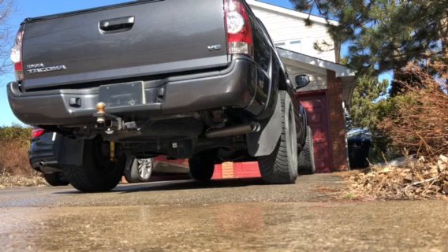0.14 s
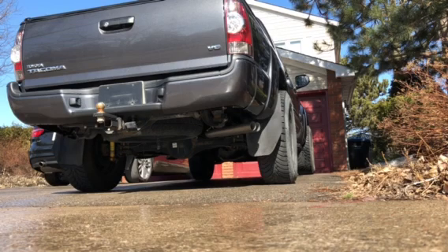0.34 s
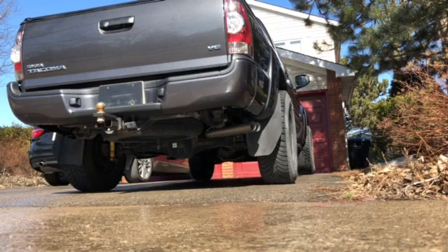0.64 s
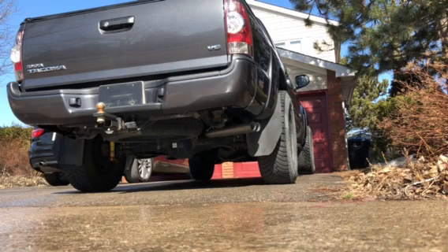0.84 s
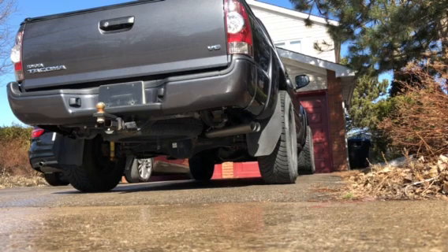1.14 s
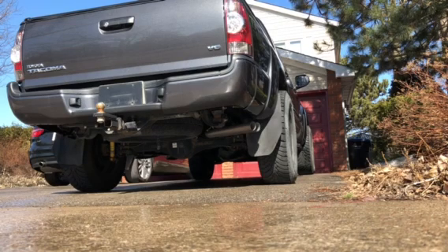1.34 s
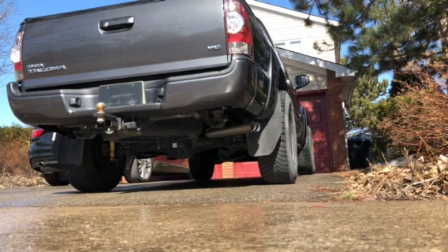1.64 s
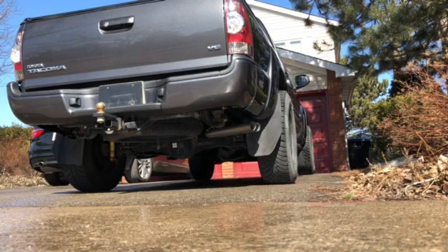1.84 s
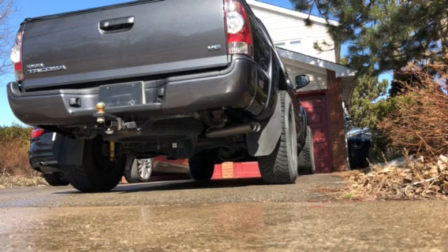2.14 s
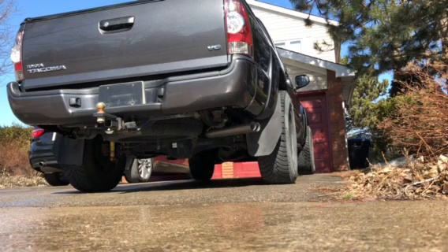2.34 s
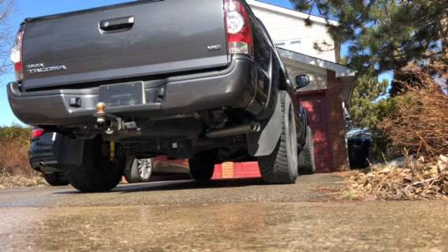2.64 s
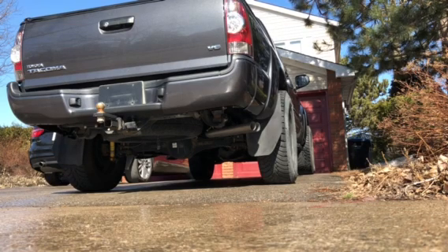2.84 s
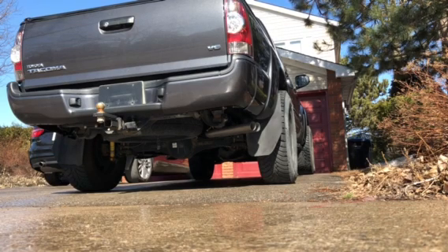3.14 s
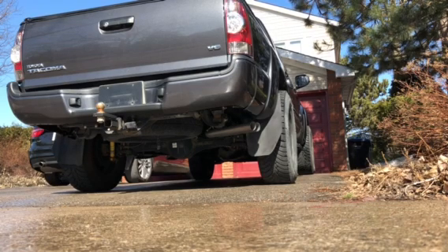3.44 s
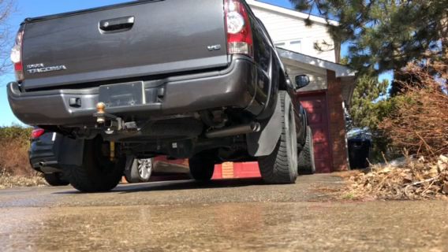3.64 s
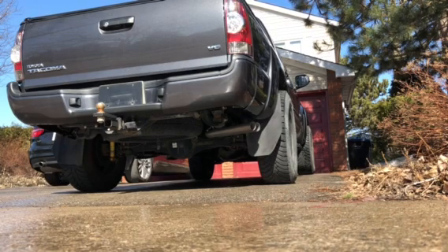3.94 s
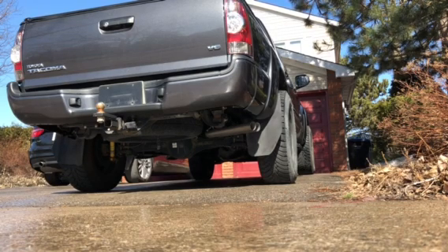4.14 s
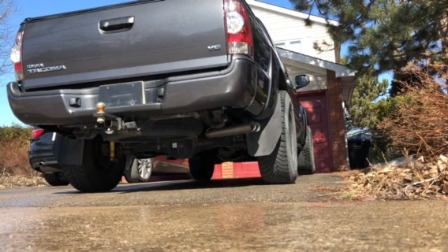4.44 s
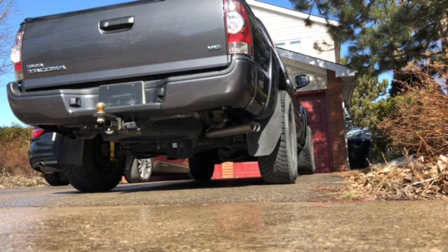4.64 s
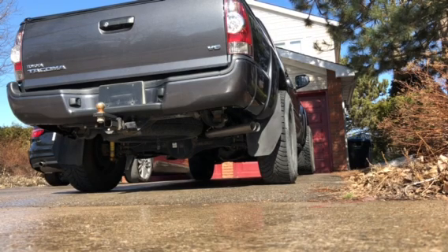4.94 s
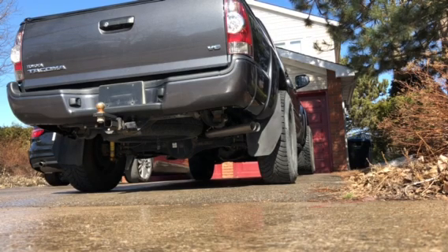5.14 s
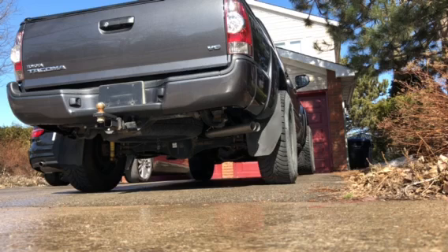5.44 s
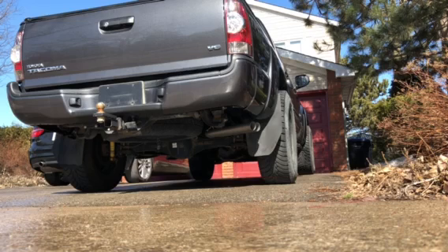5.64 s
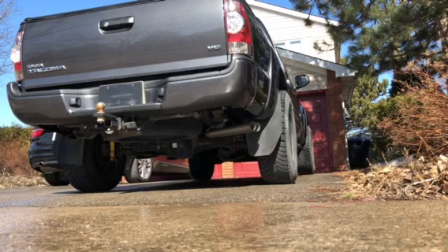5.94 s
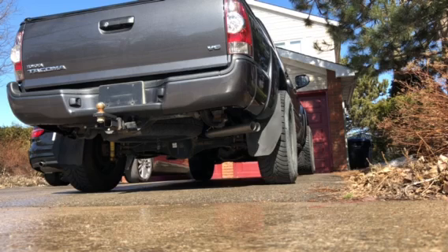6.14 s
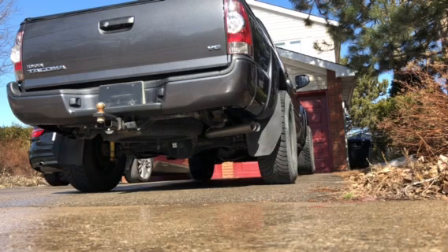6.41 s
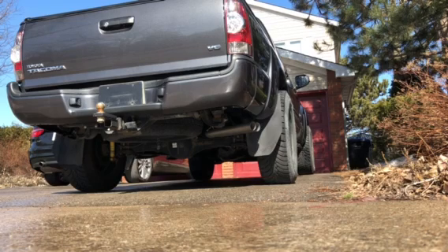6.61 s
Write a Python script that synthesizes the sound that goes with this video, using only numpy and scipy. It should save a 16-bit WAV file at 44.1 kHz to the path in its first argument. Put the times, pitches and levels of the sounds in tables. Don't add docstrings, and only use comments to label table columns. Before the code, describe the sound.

Already running, a warm truck engine burbles through its exhaust, low and close, dry outdoors. Rapid alternating pulses boom in the pipe and rasp at the outlet, with soft valve ticks in thin hiss. The idle eases downward. Two brief complete silences interrupt it; each return is subdued with tiny clicks, the second with one hard crack. Bass gradually recovers and two faint ticks follow.

```python
import sys
import numpy as np
from scipy import signal
from scipy.fft import rfft, irfft, next_fast_len
from scipy.io import wavfile
from scipy.ndimage import uniform_filter1d, map_coordinates

SR = 44100
rng = np.random.default_rng(int(sys.argv[2]) if len(sys.argv) > 2 else 0)


def level_to_linear(level):
    exponent = np.asarray(level, float) / 20
    return 10 ** exponent


def unload_wav(signal):
    wavfile.write(
        sys.argv[1],
        SR,
        np.round(np.clip(np.atleast_2d(signal).T, -1, 1) * 32767).astype(np.int16),
    )


N = 298557

# time in seconds, speed in rpm.
SPEED_RPM = [(0, 993.4), (.95, 1006.2), (1.8, 966.8), (2.85, 941.5), (3.75, 894.3), (4.6, 866.3),
             (5.3, 831), (6.77, 805.6)]
# time in seconds, level in dB about its mean.
LOAD_DB = [(0, -1), (.31, -1), (.75, 1), (1.24, 0), (1.6, 0.5), (2.5, 1), (3.3, -.5), (3.8, -0.5),
           (4.5, -1.5), (4.8, 1), (5.08, 0), (5.2, -2), (5.5, -2.5), (6, 1.5), (6.77, 3)]
# time in seconds, gain in dB.
SURGES = [
    (.555, 3.5),
    (1.205, 3),
    (3.25, 2),
]
# frequency in Hz, width in Hz, level in dB.
PIPE = [(48.1, 19, -26), (84.7, 5.2, -4.5), (93, 16, -13), (118.4, 23, 2), (138.2, 7.5, -3),
        (170.3, 11.8, -8.5), (218.8, 26.6, -7), (251.4, 24, -18.5), (336, 17, -25.5)]
UNEVEN = {3: (.15, .12), 6: (.28, .04), 7: (.06, .18), 8: (.22, .22), 9: (.1, .65), 10: (.4, .65),
          11: (.25, .35), 12: (.2, .2)}
# frequency in Hz, density in dB per Hz.
FLOW = [(15, -41), (30, -25), (50, -9), (80, -9.5), (119, -1.5), (177, -5.5), (224, 1), (262, -7.5),
        (296, -28.5), (400, -18), (520, -56)]
# frequency in Hz, density in dB per Hz.
PUFF = [(160, -30.5), (280, -0.5), (302, -6.5), (366, -0.5), (411, -9), (493, -1.5), (598, -5.5), (748, -6),
        (1090, -2.5), (1290, -11), (1880, -16.5), (2070, -26), (2700, -32.5), (3600, -52.5), (4680, -57),
        (7920, -120)]
# from in Hz, to in Hz, pulsed share.
PUFF_BANDS = [(214, 600, 0.1), (600, 1290, 0.42), (1290, 1980, 0.7), (1980, 9000, 0.8)]
# frequency in Hz, width in Hz, gain in dB.
TIP_RINGS = [(600, 50, -4), (720, 50, -4), (1095, 45, -1), (1215, 50, -3), (1345, 40, -2), (1410, 60, -5),
             (1630, 90, -3), (1836, 26, 4), (2055, 50, -1), (2230, 60, -2)]
# time in seconds, peak in dB, whistle in Hz.
HARD_PUFFS = [(0.039, -25, 1110), (0.062, -33, 1090), (0.264, -31, 1080), (0.283, -29, 1050),
              (0.344, -30, 1200), (0.364, -28, 920), (0.503, -27, 1100), (0.542, -31, 1195),
              (0.663, -26.5, 1070), (0.7, -30, 1185), (0.782, -24, 675), (0.8, -16, 1060), (0.88, -30, 895),
              (0.997, -27, 1110), (1.023, -33.5, 818), (1.04, -21, 1097), (1.099, -29.5, 1440),
              (1.142, -23, 1095), (1.241, -24, 940), (1.423, -25.5, 676), (1.443, -20, 1110),
              (1.481, -26, 1070), (1.506, -19.5, 1065), (1.691, -27, 925), (1.713, -27, 850),
              (1.73, -21, 1110), (1.769, -26.5, 1020), (1.877, -20.5, 1105), (1.919, -23.5, 1080),
              (1.96, -26, 1110), (2.084, -20, 1067), (2.105, -29, 1090), (2.187, -26, 1030),
              (2.294, -31.5, 686), (2.311, -29, 1030), (2.334, -26, 730), (2.418, -25, 1087),
              (2.46, -26.5, 680), (2.479, -25, 1085), (2.503, -36, 1110), (2.521, -20.5, 911),
              (2.607, -30, 1100), (2.629, -26.5, 1186), (2.802, -15.5, 1080), (2.883, -21, 1210),
              (2.926, -24, 1098), (3.141, -26, 1080), (3.186, -20.5, 1090), (3.228, -21, 702),
              (3.291, -17, 1060), (3.332, -22, 1016), (3.423, -20.5, 1100), (3.446, -32, 1085),
              (3.467, -27.5, 1070), (3.489, -22.5, 1117), (3.535, -33.5, 1110), (3.71, -25, 1080),
              (5.205, -34, 1090),
    (6.034, -29, 990),
    (6.47, -25.5, 818),
]
# frequency in Hz, density in dB per Hz.
HISS = [(1180, -36.5), (2000, -18), (2200, -6.5), (2910, -9.5), (3140, -11), (5120, -14.5), (9580, -20.5),
        (15100, -31), (16000, -37)]
# frequency in Hz, width in Hz, gain in dB.
SHIELDS = [(3040, 30, -2), (3548, 30, -2), (3838, 25, 1), (5500, 60, -3), (6200, 60, -4)]
# frequency in Hz, width in Hz, level in dB.
VALVE_MODES = [(5700, 1400, -3), (7800, 800, -1), (9360, 800, -1), (10600, 1100, -1), (11800, 1300, -2),
               (13600, 2500, -5)]
# start in seconds, end in seconds.
DROPOUTS = [
    (3.8022, 4.2252),
    (4.806, 5.0738),
]
# start in seconds, end in seconds, top in Hz, gain in dB.
MUFFLED = [
    (5.0738, 5.0905, 1900, -5),
    (5.0905, 5.0975, 900, -8),
    (5.0975, 5.1088, 1800, -3),
]
# time in seconds, peak in dB, length in ms, treble
# in dB.
CLICKS = [
    (4.2256, -48, .3, 0),
    (4.2375, -37, .25, 0),
    (5.0744, -33, .25, -2),
    (5.0859, -5, .22, -3),
    (5.0977, -46, .25, 0),
    (5.1092, -37, .25, -2),
    (5.5697, -36, .3, -14),
    (5.5842, -43, .35, -8),
]
# frequency in Hz, density in dB per Hz.
CLICK_SPECTRUM = [(1000, -48), (2500, -10), (4000, -0.5), (5400, 2), (7400, -8.5), (8800, -2),
                  (10000, -14.5), (11300, 0.5), (13300, -0.5), (14400, -0.5), (14850, -32), (15400, -2),
                  (16300, -14), (17000, -59.5)]
# frequency in Hz, level in dB, 60 dB decay in seconds.
PINGS = [(4000, -44, .005), (5890, -34, .007), (8870, -40, .006), (11300, -48, .005), (14530, -52, .006)]
# frequency in Hz, width in Hz, level in dB.
TAIL_MODES = [(5800, 870, 17.0), (9200, 1200, 11.0), (11450, 1800, -3), (14500, 1700, -4.5)]

TOP_HZ = 15800
BOOM_DB, RASP_DB, HISS_DB = -31.5, -37.5, -57
RASP_FOLLOWS, HISS_FOLLOWS = 0.19, 0.53
BANK_PER_TURN, BANK_START = 1.5, -.1023
PIPE_TONES = 13
SLIP_PER_HZ, SLIP_FROM_HZ = .125, 24.6
SURGE_S = 0.02
PUFF_DELAY_S, NEAR_BANK_DB = .002, 9
DUCK_DB, SECOND_DUCK_DB, SETTLES_DB, RECOVER_S = -8.5, -9.5, -5, 0.83
BASS_DUCKS = 1.52
FADE_S, FADE_DB = 0.032, -6
CUT_DB, CUT_S, THUMP_DB, THUMP_S = -29, .0004, -38, .006
SLAM = 3


def unit(x):
    return x / np.sqrt(np.mean(x ** 2) + 1e-20)


def along(points, hz):
    f, v = np.transpose(points)
    return np.interp(np.log(hz + 1), np.log(f + 1), v)


def wobble(rate_hz):
    knots = rng.standard_normal(int(N * rate_hz / SR) + 4)
    return map_coordinates(knots, [np.arange(N) * rate_hz / SR])


def filtered(x, response):
    m = next_fast_len(N + SR // 2)
    return irfft(rfft(x, m) * response(np.fft.rfftfreq(m, 1 / SR)), m)[:N]


def causal(points):
    size = level_to_linear(along(points, np.fft.rfftfreq(4096, 1 / SR)))
    cepstrum = irfft(np.log(np.maximum(size, 1e-5)))
    cepstrum[1:2048] *= 2
    cepstrum[2049:] = 0
    return irfft(np.exp(rfft(cepstrum)))[:2048]


def modes(table, f):
    return sum((-1) ** k * level_to_linear(db) * 1j * f * width_hz / (hz * hz - f * f + 1j * f * width_hz)
               for k, (hz, width_hz, db) in enumerate(table))


def boom(bank_hz, count):
    grid_hz = np.arange(1, 400)
    pipe = sum(level_to_linear(db) * np.abs(modes([(hz, width_hz, 0)], grid_hz)) ** 2 for hz, width_hz, db in PIPE)
    tones = np.zeros(N)
    stagger = .012 * wobble(3)
    slip = SLIP_PER_HZ * (bank_hz - SLIP_FROM_HZ)
    for k in range(1, PIPE_TONES + 1):
        level = np.interp(k * bank_hz, grid_hz, pipe) * level_to_linear(wobble(7))
        flip = .5 * (k in (3, 6, 12)) + slip * (k > 6)
        turn = 2 * np.pi * (k * (count + stagger) + flip - .09) + .02 * k * wobble(9)
        below, above = np.outer(UNEVEN.get(k, (.04, .05)), 1 + slip)
        cycle = 2 * np.pi * (count / 3 - slip + .35 * (k != 9))
        sides = above * np.cos(turn + cycle) + below * np.cos(turn - cycle)
        tones += level * (np.cos(turn) + sides)
    flow = unit(filtered(rng.standard_normal(N), lambda f: level_to_linear(along(FLOW, f))))
    return unit(unit(tones) + level_to_linear(-13) * flow)


def puffs(fire, size, rise_s, fall_s):
    start = np.zeros(N)
    start[fire] = size
    t = np.arange(SR // 10) / SR
    return signal.fftconvolve(start, (1 - np.exp(-t / rise_s)) * np.exp(-t / fall_s))[:N]


def turbulence(late, hard_db, luck):
    blast = np.zeros(N)
    for k, (lo_hz, hi_hz, pulsed) in enumerate(PUFF_BANDS):
        bank_db = NEAR_BANK_DB * (lo_hz > 1500) * (np.arange(len(late)) % 2)
        size = level_to_linear(.5 * hard_db + bank_db + 1.5 * luck[:, k + 8])
        gate = pulsed * unit(puffs(late, size, rise_s=.0014, fall_s=.0045)) + .45
        blast += filtered(unit(gate) * rng.standard_normal(N), lambda f: (f >= lo_hz) & (f < hi_hz))
    blast = signal.fftconvolve(blast, causal(PUFF))[:N]
    return unit(filtered(blast, lambda f: 1 + sum(np.abs(modes([ring], f)) ** 2 / level_to_linear(ring[2])
                                                  for ring in TIP_RINGS)))


def whistle(late, hard_db, pitch_hz, luck):
    t = np.arange(SR // 50) / SR
    glide = 1 + 4 * luck[:, 1:2] * t
    chirp = level_to_linear(hard_db + 1.3 * luck[:, 7])[:, None] * np.sin(2 * np.pi * pitch_hz * t * glide)
    chirp = chirp * (1 - np.exp(-t / .0014)) * np.exp(-t / .0055)
    place = late[:, None] + np.arange(len(t))
    return unit(np.bincount(place.ravel(), chirp.ravel(), N + len(t))[:N])


def rasp(fire, rasp_db, luck):
    delay_s = PUFF_DELAY_S + 0.0008 * luck[:, 0]
    late = np.clip(fire + np.round(delay_s * SR).astype(int), 0, N - 1)
    hard_db = np.zeros(len(fire))
    pitch_hz = 1080 * np.exp(.27 * np.clip(luck[:, 6:7], -1.9, 1.9))
    for s, db, hz in HARD_PUFFS:
        k = np.argmin(np.abs(fire - (s + .001) * SR))
        hard_db[k] = np.clip(db - rasp_db[fire[k]] - 7, 3, 6.5)
        pitch_hz[k] = hz
        late[k] = round((s - .001) * SR)
    return unit(turbulence(late, hard_db, luck) + level_to_linear(-7.5) * whistle(late, hard_db, pitch_hz, luck))


def valves(fire, luck):
    ticks = np.maximum(fire[::2] - round(0.0073 * SR), 0)
    size_db = 4 * (np.arange(len(ticks)) % 3 > 0) + 2.5 * luck[::2, 5]
    noise = unit(puffs(ticks, level_to_linear(size_db), rise_s=.003, fall_s=.008)) * rng.standard_normal(N)
    return unit(filtered(noise, lambda f: np.abs(modes(VALVE_MODES, f)) ** 2))


def hiss(fire, luck):
    gate = .9 + .14 * unit(puffs(fire, level_to_linear(2 * luck[:, 4]), rise_s=.002, fall_s=.008))
    air = gate * level_to_linear(0.39 * wobble(16)) * rng.standard_normal(N)
    air = unit(filtered(air, lambda f: level_to_linear(along(HISS, f)) * (1 + np.abs(modes(SHIELDS, f)))))
    return unit(air + level_to_linear(-12.5) * valves(fire, luck))


def gain_db():
    t = np.arange(N) / SR
    first_end, second_end = DROPOUTS[0][1], DROPOUTS[1][1]
    recovery = np.exp(-np.maximum(t - second_end, 0) / RECOVER_S)
    back_db = SETTLES_DB + (SECOND_DUCK_DB - SETTLES_DB) * recovery
    return np.where(t < first_end, 0, np.where(t < second_end, DUCK_DB, back_db))


def dull_return(heard):
    t = np.arange(N) / SR
    for a, b, top_hz, db in MUFFLED:
        share = uniform_filter1d(1. * ((t > a) & (t < b)), size=31)
        dull = filtered(heard, lambda hz: level_to_linear(-16) + 1 / (1 + (hz / top_hz) ** 6))
        heard = heard + share * (level_to_linear(db) * dull / (1 + level_to_linear(-16)) - heard)
    return heard


def dropouts(heard):
    t = np.arange(N) / SR
    alive = np.ones(N)
    for a, b in DROPOUTS:
        alive[(t > a) & (t < b)] = 0
    a, b = DROPOUTS[0]
    thump = level_to_linear(THUMP_DB) * np.exp(-np.abs(t - b) / THUMP_S)
    jump = (level_to_linear(CUT_DB) + heard[int(a * SR)]) * np.exp(-np.abs(t - a) / CUT_S)
    return (heard + (thump - jump)) * uniform_filter1d(alive, size=3)


def crackles():
    out = np.zeros(N)
    f = np.fft.rfftfreq(1024, 1 / SR)
    for s, db, ms, treble_db in CLICKS:
        smear = np.exp(1j * np.pi * ms / 1000 * f ** 2 / 6000 + .5j * np.sin(f / 700 + 6 * rng.random()))
        size = level_to_linear(along(CLICK_SPECTRUM, f) + treble_db * np.clip(f / 7000 - 1, 0, 1))
        burst = np.fft.fftshift(irfft(size * smear))
        burst = burst * np.exp(-((np.arange(1024) - 512 + ms / 1000 * SR) / 36) ** 2)
        out[round((s + ms / 1000) * SR) - 512:][:1024] += level_to_linear(db) * burst / np.abs(burst).max()
    return out


def tick_tails():
    t = np.arange(N) / SR
    fade = np.zeros(N)
    for s, *_ in CLICKS[-2:]:
        away = np.abs(t - s)
        fade += (t > s) * (level_to_linear(-62 - 60 * away / .008) + level_to_linear(-70 - 60 * away / .2))
    tail = filtered(fade * rng.standard_normal(N), lambda f: modes(TAIL_MODES, f) * (f < TOP_HZ))
    since = np.clip(t - CLICKS[-1][0] + .0007, 0, 1)
    pings = sum(level_to_linear(db - 60 * since / t60_s) * np.sin(2 * np.pi * hz * since) for hz, db, t60_s in PINGS)
    return tail + pings * (1 - np.exp(-since / .0004))


def slam():
    u = np.arange(N) / SR - CLICKS[SLAM][0]
    before = (u < -.0006) & (u > -.0118)
    lead = np.minimum(u, 0)
    swell = level_to_linear(-19) * np.exp(lead / 0.0016) + level_to_linear(-41) * np.exp(lead / .012)
    after = np.clip(u + .00035, 0, .02)
    sweep = level_to_linear(-17.5) * np.exp(-after / 0.0013) * np.sin(2 * np.pi * 1.7 * np.log(1 + after / 0.0004))
    return before * swell * np.sin(2 * np.pi * 3040 * u) + sweep


def scene():
    t = np.arange(N) / SR
    load_db, duck_db = np.interp(t, *np.transpose(LOAD_DB)), gain_db()
    boom_db = BOOM_DB + load_db + BASS_DUCKS * duck_db
    boom_db += sum(db * np.exp(-((t - s) / SURGE_S) ** 2) for s, db in SURGES)
    boom_db += sum(FADE_DB * np.clip(1 + (t - a) / FADE_S, 0, 1) * (t < b) for a, b in DROPOUTS)
    rasp_db = RASP_DB + RASP_FOLLOWS * load_db + duck_db
    rasp_db += FADE_DB * np.clip(1 - np.abs(t - DROPOUTS[0][1]) / FADE_S, 0, 1)
    hiss_db = HISS_DB + HISS_FOLLOWS * load_db + duck_db
    bank_hz = np.interp(t, *np.transpose(SPEED_RPM)) / 60 * BANK_PER_TURN
    count = BANK_START + np.cumsum(bank_hz) / SR
    fire = np.flatnonzero(np.diff(np.floor(2 * count + .3)))
    luck = rng.standard_normal((400, 12))[:len(fire)]
    engine = level_to_linear(boom_db) * boom(bank_hz, count)
    engine += level_to_linear(rasp_db) * rasp(fire, rasp_db, luck)
    engine += level_to_linear(hiss_db) * hiss(fire, luck)
    return engine[None]


def low_pass(x):
    return signal.sosfilt(signal.butter(12, 17110, fs=SR, output="sos"), x)


def record(dry):
    heard = filtered(dry[0], lambda hz: hz < TOP_HZ)
    heard = dropouts(dull_return(heard))
    mix = heard + crackles() + tick_tails() + slam()
    return low_pass(mix[None])


dry = scene()
out = record(dry)
unload_wav(out)
```